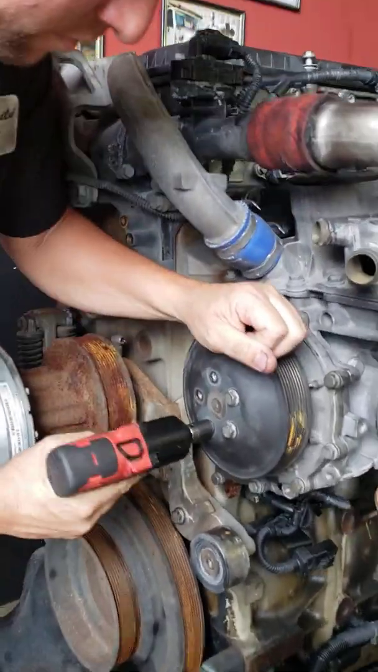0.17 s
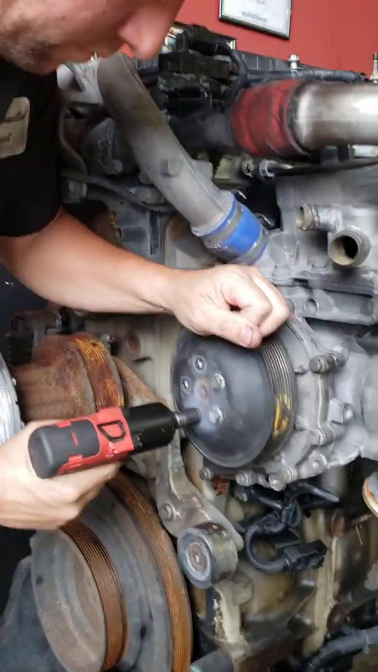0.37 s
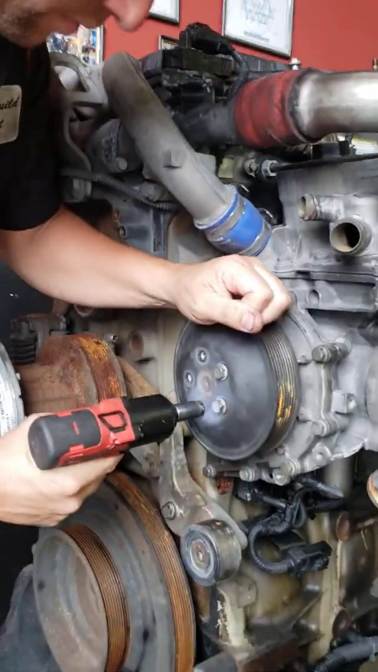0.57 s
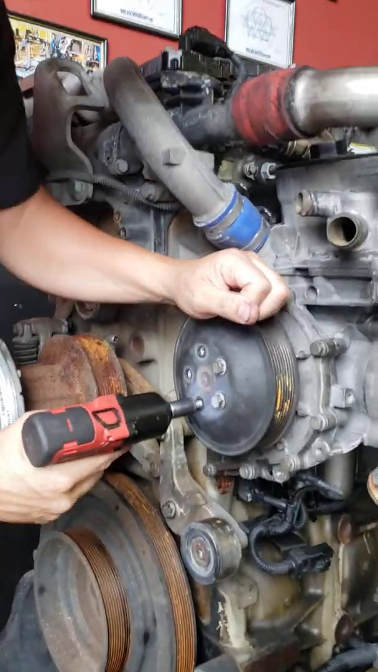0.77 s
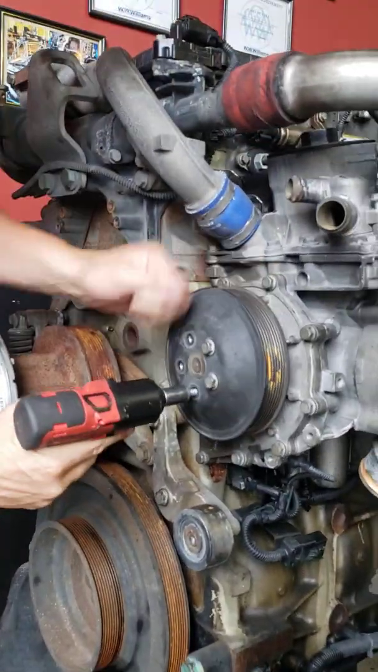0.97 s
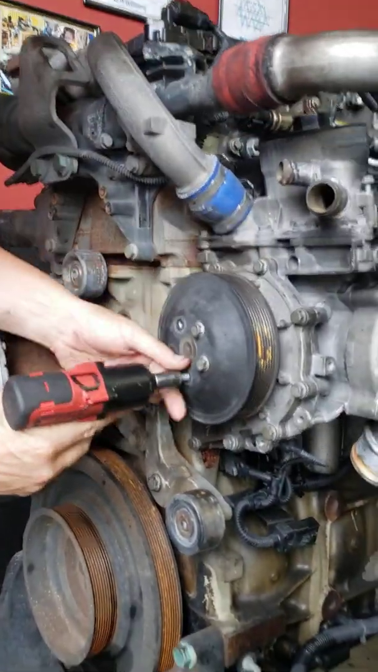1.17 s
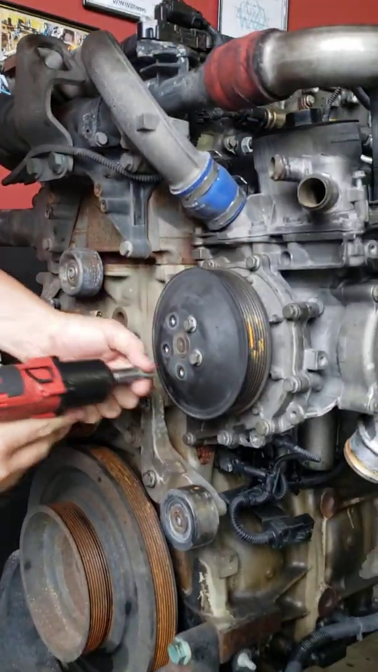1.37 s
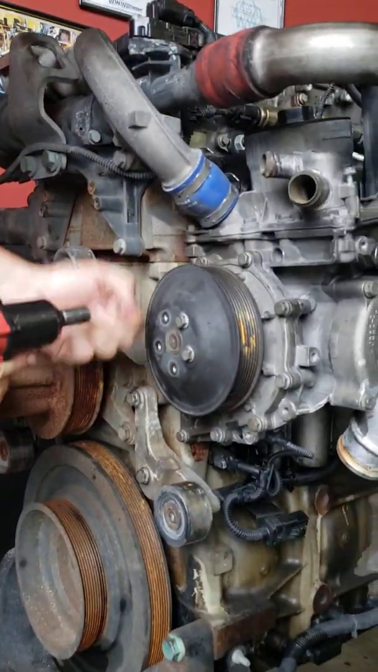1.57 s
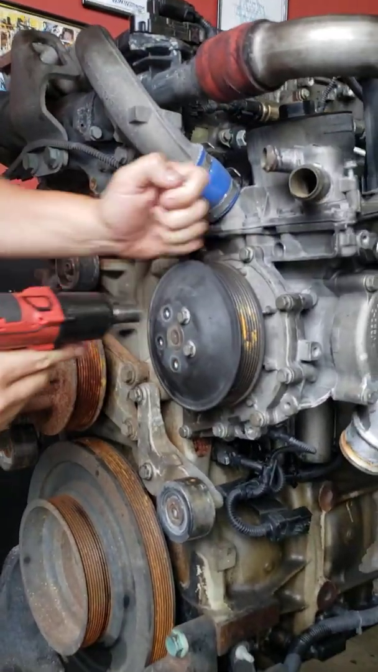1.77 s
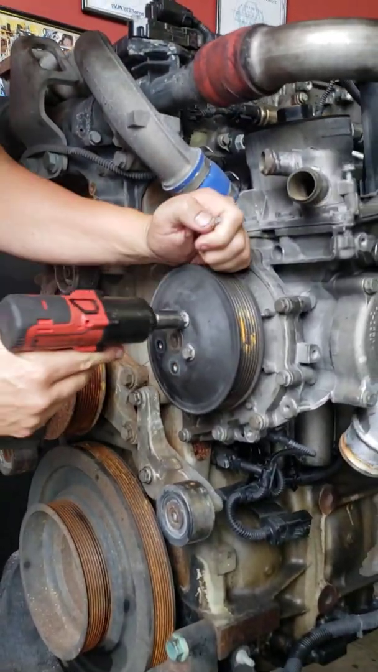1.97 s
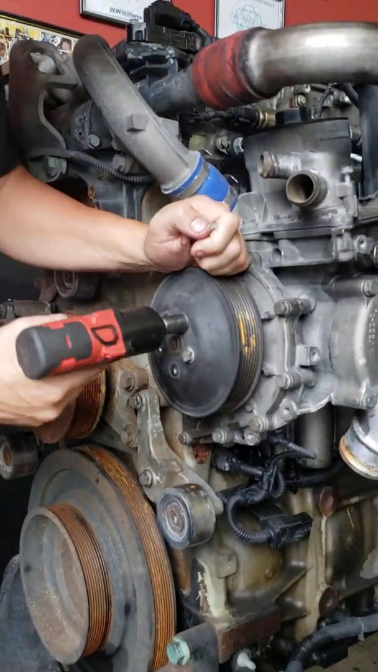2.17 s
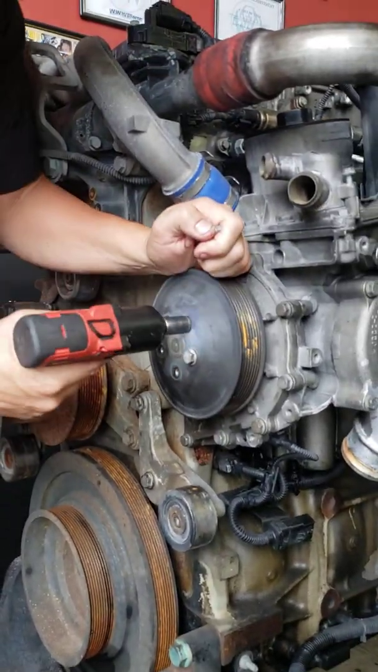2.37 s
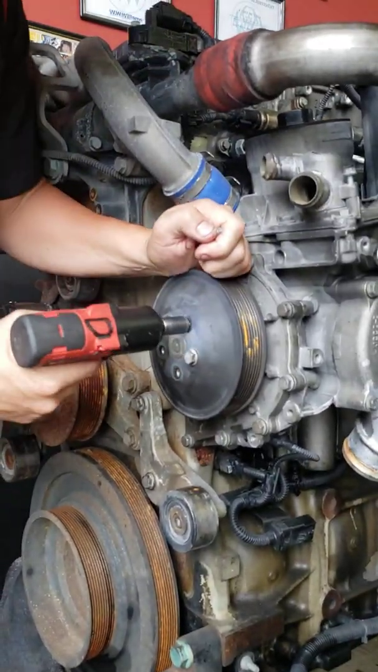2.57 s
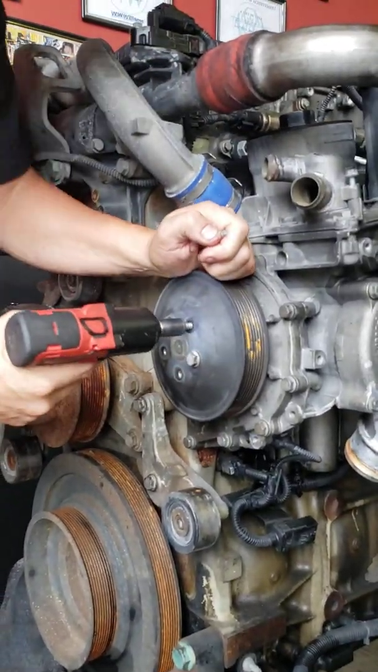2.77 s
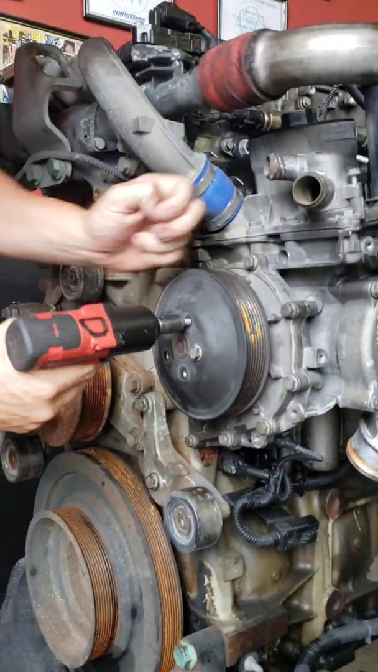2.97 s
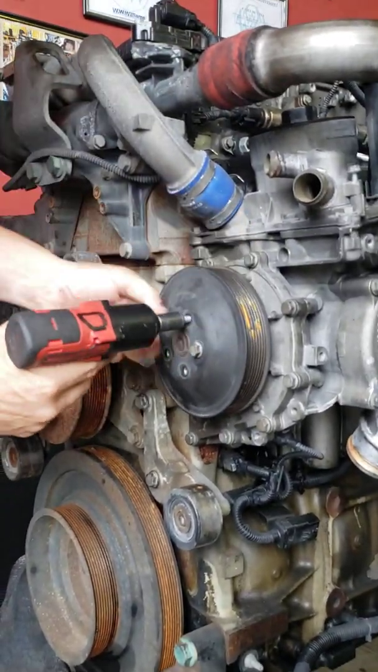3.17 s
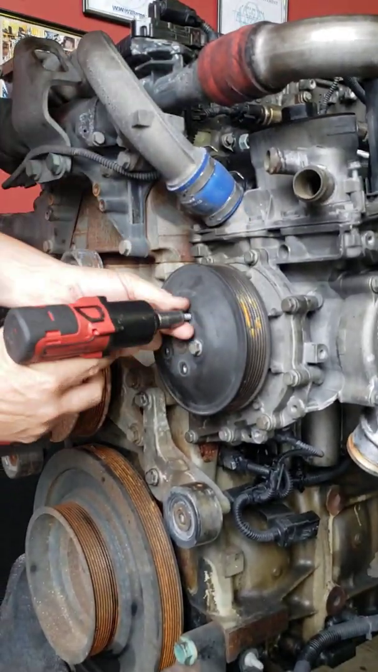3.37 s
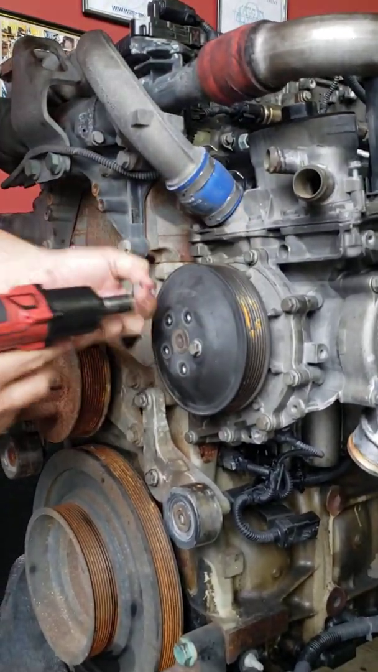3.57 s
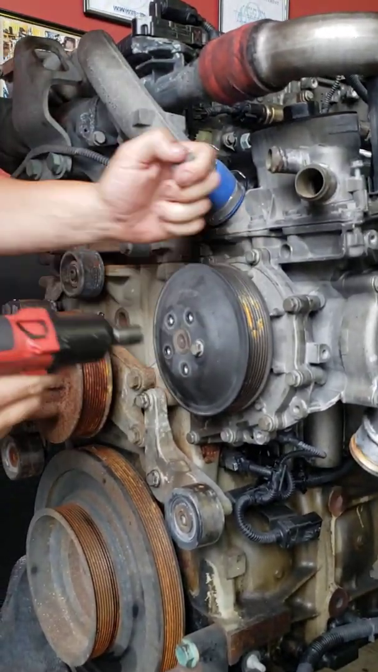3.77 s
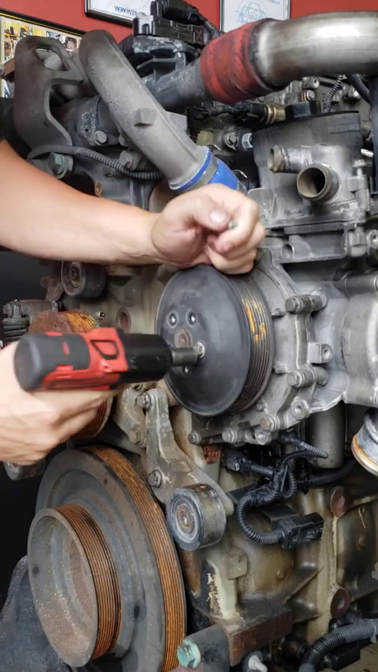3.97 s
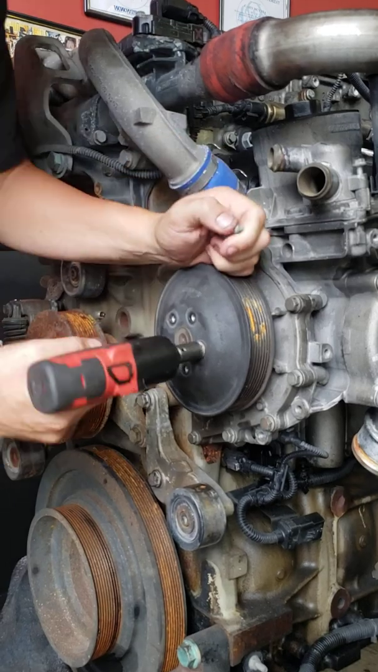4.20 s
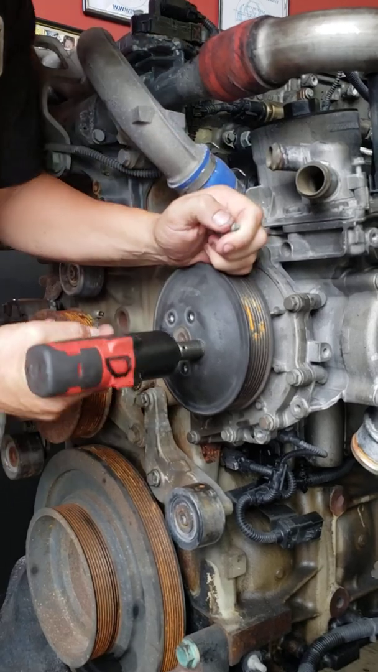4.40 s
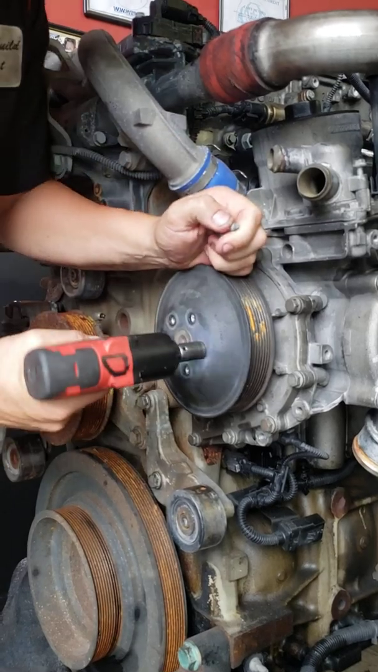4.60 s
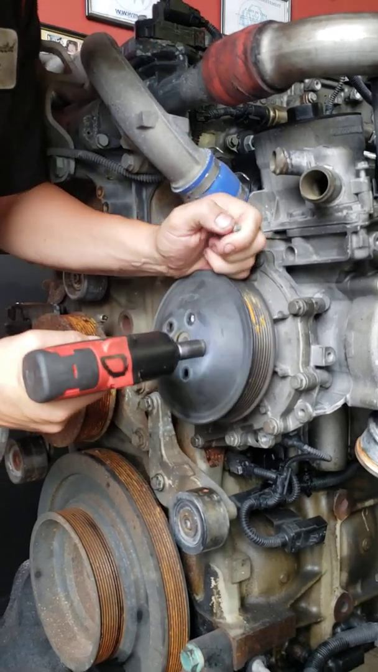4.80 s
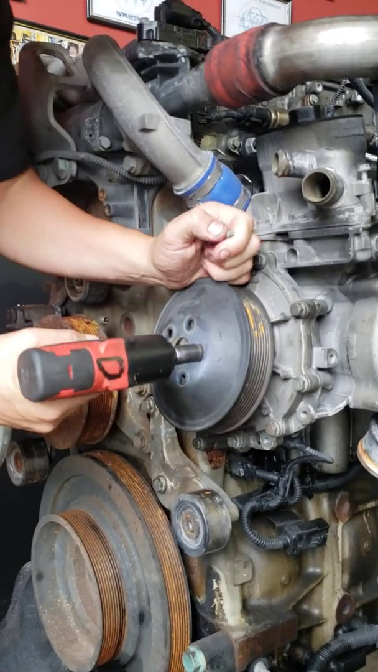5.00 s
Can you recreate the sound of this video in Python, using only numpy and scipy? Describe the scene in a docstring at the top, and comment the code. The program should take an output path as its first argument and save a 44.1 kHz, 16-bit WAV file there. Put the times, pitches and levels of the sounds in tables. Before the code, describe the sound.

Close up in a workshop, a cordless impact wrench loosens pulley bolts. Soft socket knocks lead to a tiny trigger click and a burst of six fast, loud metallic cracks, then the motor spins free with a rising whine and stops. Two similar bursts follow about two seconds apart, with knocks, clinks and near-quiet between. A faint low hum wavers behind, and the room adds a short reverberant tail.

```python
"""A cordless impact wrench runs bolts out of a steel pulley in a workshop.
Each burst is a few hammer blows (noise cracks and ringing modes), then the motor spins free and whines upward
(shaped noise and gear tones). Between bursts come socket knocks, bolt clinks and trigger clicks.
Distant machines fill the room: banded noise, a wavering low hum and two mains lines."""
import sys
import numpy as np
from scipy import signal
from scipy.fft import rfft, irfft, next_fast_len
from scipy.io import wavfile

SR = 44100
rng = np.random.default_rng(int(sys.argv[2]) if len(sys.argv) > 2 else 0)


def digitize_waveform(pressure):
    """Quantize a signal to 16-bit integers and store it at the path in sys.argv[1].

    Rows of a 2-D input are taken as channels; values are limited to [-1, 1].
    """
    field = np.atleast_2d(pressure).T
    bounded = np.clip(field, -1, 1)
    quanta = np.round(bounded * 32767).astype(np.int16)
    wavfile.write(sys.argv[1], SR, quanta)


def attenuation_scalar(level_db):
    """Turn a level in dB into a linear amplitude multiplier (20 dB per decade)."""
    decades = np.asarray(level_db, float) / 20
    return 10 ** decades


N = 222326

# trigger pulls: first blow t/s, bolt hangs loose t/s, trigger released t/s, nominal blow level/dB,
# thud re crack level/dB, motor level/dB
BURSTS = [(0.4328, 0.804, .855, -8.5, -8.5, -41), (2.4657, 2.808, 2.935, -8.5, -10.5, -39.5),
          (4.6537, 5.1, 5.2, -9, -9.5, -40.5)]
# hammer blows in each trigger pull: count
BLOWS_PER_BURST = [6, 5, 6]
# ringing modes of the steel pulley: f/Hz, level/dB, t60/s
PULLEY = [(522, -17, .22), (1104, 0, .17), (1534, -15, .08), (1933, -24, .2), (3295, -36, .15),
          (4064, -29, .12)]
FIRST_GAP_S, GAP_S = .0212, .0189   # between blows


def rms_one(x):
    """Scales a signal to rms 1."""
    return x / np.sqrt(np.mean(x ** 2) + 1e-20)


def at_hz(points, hz):
    """Reads a curve of (f/Hz, value) on a log frequency axis."""
    f_hz, value = np.array(points).T
    return np.interp(np.log(hz), np.log(f_hz), value)


def drift(rate_hz):
    """Slow random wander of rms 1: noise through two equal poles, run at SR / 40."""
    r = np.exp(-80 * np.pi * rate_hz / SR)
    white = rng.standard_normal(N // 40 + 2002)
    slow = signal.lfilter([1], [1, -2 * r, r * r], white)[2000:]   # drops the settling
    return np.interp(np.arange(N) / 40, np.arange(len(slow)), rms_one(slow))


def wide_noise(alike):
    """Two draws of stereo white noise; alike sets the correlation of the channels."""
    mid, side = rng.standard_normal((2, 2, 1, N))
    return np.sqrt(alike) * mid + np.sqrt(1 - alike) * side * [[1], [-1]]


def bands(spectrum):
    """Third-octave filters inside a spectrum's range, with centre and gain."""
    edges_hz = 22 * 2 ** np.arange(0, 9.7, 1 / 3)
    for low, high in zip(edges_hz, edges_hz[1:]):
        hz = np.sqrt(low * high)
        if spectrum[0][0] < hz and low < spectrum[-1][0]:
            sos = signal.butter(2, [low, high], "band", fs=SR, output="sos")
            yield sos, hz, attenuation_scalar(at_hz(spectrum, min(hz, 15200)))


def ring(clicks, hz, t60_s):
    """Two-pole resonator: a unit click sets off a decaying sine of height 1."""
    r, w = attenuation_scalar(-60 / (t60_s * SR)), 2 * np.pi * hz / SR
    return signal.lfilter([0, np.sin(w)], [1, -2 * r * np.cos(w), r * r], clicks + 1e-18)


def struck(modes, s, blow_db):
    """Every onset rings every mode; chance varies the strength of each mode."""
    out = np.zeros(N)
    strength_db = rng.normal(0, 2.2, (len(s), len(modes)))
    for k, (hz, level_db, t60_s) in enumerate(modes):
        clicks = np.zeros(N)
        clicks[(s * SR).astype(int)] = attenuation_scalar(blow_db + level_db + strength_db[:, k])
        out += ring(clicks, hz, t60_s)
    return out


def contacts(rows, pulley_db, crack_t60_s, thud_t60_s, tick_db):
    """Each contact is a sharp tick and a rattle that dies, coloured by the tool, and rings the pulley."""
    # colour of metal contact: f/Hz, level/dB per Hz
    crack = [(88, -53.5), (150, -19.5), (371, -18.5), (798, -2.5), (972, -8.5), (1120, -6), (1860, -13),
             (2180, -21), (3420, -8.5), (6050, -16.5), (7220, -10), (8450, -40), (12800, -3), (15600, -10),
             (16500, -31.5)]
    s, level_db, treble_db, thud_db = np.transpose(rows)
    out = 0
    white = wide_noise(alike=.75) * attenuation_scalar(3.5 * drift(150) - 1.5)   # the rattle comes in lumps
    for k, (sos, hz, gain) in enumerate(bands(crack)):
        thud_share = np.clip(np.log2(2400 / hz), 0, 1)
        treble_share = np.clip(np.log2(hz / 7000) * 2, 0, 1)
        tilt_db = thud_db * thud_share + treble_db * treble_share
        t60_s = at_hz([(800, thud_t60_s), (3000, crack_t60_s)], hz)
        clicks = np.zeros(N)
        clicks[(s * SR).astype(int)] = attenuation_scalar(level_db + tilt_db + rng.normal(0, 1.5, len(s)))
        fading = signal.lfilter([1], [1, -attenuation_scalar(-60 / (t60_s * SR))], clicks + 1e-18)
        out = out + gain * signal.sosfilt(sos, fading * white[k % 2] + attenuation_scalar(tick_db) * clicks)
    return attenuation_scalar(7.0) * out + struck(PULLEY, s, level_db + pulley_db + 0.38 * thud_db)


def blow_rows():
    """Blow timing and levels: a slow dull first blow, then an even run from two unequal lugs."""
    fade_db, weak_lug_db, scatter_db = 0.9, -0.5, 0.5   # per blow; every second blow; chance
    first_treble_db, treble_db = -12, -2   # re crack
    rows = []
    for (first_s, _, _, peak_db, thud_db, _), count in zip(BURSTS, BLOWS_PER_BURST):
        k = np.arange(count)
        s = first_s + (k > 0) * (FIRST_GAP_S + GAP_S * (k - 1))
        lug_db = weak_lug_db * (k % 2)
        level_db = peak_db - fade_db * k + lug_db + scatter_db * rng.standard_normal(count)
        blow_treble_db = np.where(k == 0, first_treble_db, treble_db - lug_db)
        rows += zip(s, level_db, blow_treble_db, thud_db + 0 * s)
    return np.array(rows)


def hammering():
    """Hammer on anvil: each blow cracks, rings the pulley and rings the anvil's own high modes."""
    # ringing modes of the anvil: f/Hz, level/dB, t60/s
    anvil = [(6971, -27, .08), (7413, -17, .11), (9997, -16, .1), (12250, -13, .2), (12600, -7, .05),
             (12910, -14, .15), (13900, -9, .08), (14175, -9, .12), (14958, -8, .13)]
    rows = blow_rows()
    cracks = contacts(rows, pulley_db=-20.5, crack_t60_s=0.076, thud_t60_s=0.12, tick_db=21.5)
    return cracks + struck(anvil, rows[:, 0], rows[:, 1] + rows[:, 2] - 4)


def trigger(t):
    """Whine and levels: held back while hammering, speeding up once the bolt turns, braked at release."""
    loaded_hz, free_hz, speed_up_s, brake_hz_per_s = 2110, 2345, .24, 3000   # gear whine
    wind_up_s, wind_up_db, surge_db, settle_s, brake_db_per_s = .018, -5, 6.5, .08, 500   # dB re motor level
    seated_rattle_db, loose_rattle_db = -22, -9   # re whirr
    whine_hz = np.full(N, 1. * loaded_hz)
    whirr, rattle, loose = np.zeros((3, N))
    for (first_s, loose_s, release_s, _, _, motor_db), count in zip(BURSTS, BLOWS_PER_BURST):
        free_s = first_s + FIRST_GAP_S + GAP_S * (count - 1)   # one gap step after the last blow's offset
        free, braked = np.maximum(t - free_s, 0), np.maximum(t - release_s, 0)
        on = (t > first_s - wind_up_s) & (braked < .1)
        climb_hz = free_hz - (free_hz - loaded_hz) * np.exp(-free / speed_up_s)
        whine_hz[on] = (climb_hz - brake_hz_per_s * braked)[on]
        hammering_db = np.interp(t, [first_s, free_s], [wind_up_db, surge_db])
        load_db = np.where(t < free_s, hammering_db, surge_db * np.exp(-free / settle_s))
        level = on * attenuation_scalar(motor_db + load_db - brake_db_per_s * braked)
        whirr += level
        loose += on * np.clip((t - loose_s) / .04, 0, 1)
        rattle_db = np.interp(t, [loose_s, loose_s + 0.0067], [seated_rattle_db, loose_rattle_db])
        rattle += level * attenuation_scalar(rattle_db)
    return whine_hz, whirr, rattle, loose


def motor():
    """Air and bearing whirr, wavering gear tones that climb with speed, and the bolt rattling on the pulley."""
    # colour of the whirr: f/Hz, level/dB per Hz
    whirr_spectrum = [(120, -50), (200, -21.5), (312, -12), (434, -22.5), (829, -7), (1770, -12.5),
                      (2210, -6), (2460, -5), (3370, -5.5), (3630, 2.5), (7060, -6.5), (8180, -39.5),
                      (11200, -6), (15300, -1.5), (16500, -16)]
    # gear and fan tones: multiple of the whine, level/dB re whirr, change once the bolt hangs loose/dB
    gear_tones = [(.125, -27, 0), (1.0, -12, -2), (1.525, -10.5, -7), (1.725, -8, -2), (2.05, -11, -9),
                  (5.09, -7, -8)]
    # modes of the rattling bolt: f/Hz, level/dB, t60/s
    rattle_modes = [(537, -13.5, 0.044), (837, -1.5, 0.037), (1462, -11, 0.066)]
    white = wide_noise(alike=0.46)
    whine_hz, whirr_level, rattle_level, loose = trigger(np.arange(N) / SR)
    turn = 2 * np.pi * np.cumsum(whine_hz) / SR
    whirr = 0
    for k, (sos, _, gain) in enumerate(bands(whirr_spectrum)):
        whirr = whirr + gain * attenuation_scalar(1.9 * drift(5.7)) * signal.sosfilt(sos, white[k % 2])
    whirr = rms_one(whirr)
    whirr *= attenuation_scalar(1.5 * np.sin(turn / 8))   # throb, once a rotor turn
    meshed = np.clip((whine_hz - 2110) / 60, 0, 1)   # tones come in as the whine climbs off its loaded pitch
    for multiple, level_db, loose_db in gear_tones:
        level = attenuation_scalar(level_db + loose_db * loose + 2.2 * drift(12))
        wobble = .5 * np.sqrt(multiple) * drift(25)
        whirr += meshed * level * np.sin(multiple * turn + wobble)
    taps = (rng.random(N) < 600 / SR) * rng.standard_normal(N)   # about 600 per s
    rattle = rms_one(sum(attenuation_scalar(level_db) * ring(taps, hz, t60_s) for hz, level_db, t60_s in rattle_modes))
    return whirr_level * whirr + rattle_level * rattle


def knocks_and_clicks():
    """Socket and bolts touching metal, and the trigger's clicks: lighter contacts of the same kind."""
    # knocks: t/s, nominal crack level/dB, treble re crack level/dB, thud re crack level/dB
    knocks = [(0.0014, -41, -6, 7), (0.1037, -36, -12, -9), (0.1641, -28, -13, 0.5),
              (0.2633, -50.5, -24, 7), (0.3535, -32, -10, -19.5), (0.8675, -33, -0.5, -7.5),
              (1.3154, -60.5, 10.5, -22.5), (1.4795, -55, -28, -38), (1.5259, -49.5, -5.5, -35.5),
              (1.6372, -53, -15, -18), (2.0675, -37, -11, -4), (2.0781, -36, -24, -15.5),
              (2.1264, -33, -15, -1), (2.4084, -61, -1, -1.5), (2.818, -31.5, 5, -3),
              (2.8426, -30.5, 2.5, -2), (2.8727, -25, -1.5, -0.5), (2.8971, -40, 6, -7),
              (3.9713, -62, -23, 9), (4.0615, -26, -6.5, -2), (4.2544, -32.5, -9, -7.5),
              (4.2771, -22.5, -5.5, 5.5), (4.6054, -41.5, -9.5, -10)]
    # trigger clicks: t/s, nominal crack level/dB, treble re crack level/dB, thud re crack level/dB
    trigger_clicks = [(0.412, -45.5, -16, -13), (2.4432, -42, -18, -17.5), (4.6363, -37, -16, -10)]
    return contacts(knocks + trigger_clicks, pulley_db=-24.5, crack_t60_s=0.064, thud_t60_s=0.15, tick_db=14.0)


def clinks():
    """A loose bolt clinks in the socket and rings the socket's modes."""
    # ringing modes of the socket: f/Hz, level/dB, t60/s
    socket = [(7343, -5, 0.1), (8371, -19, 0.31), (10010, -20, 0.16), (12050, -12, 0.2), (12250, -4, 0.22),
              (12500, 0, 0.13), (12930, -8, 0.41), (13160, -12, 0.32), (13930, -11, 0.19),
              (14170, -12, 0.45), (14970, -24, 0.27)]
    # clinks: t/s, ring level/dB
    clink_rows = [(0.868, -52.5), (1.315, -50.5), (2.818, -43.5), (2.871, -54), (2.896, -47), (4.064, -56)]
    return struck(socket, *np.transpose(clink_rows))


def pulley_ringing():
    """The pulley's modes ring on as the first burst stops and at a later knock."""
    # onsets of the ringing: t/s, ring level/dB
    ring_rows = [(0.885, -56.5), (4.0616, -31.5)]
    return struck(PULLEY, *np.transpose(ring_rows))


def lingering_tone():
    """A thin tone, one slowly decaying mode, rings on after the loose bolt has rattled."""
    # mode: f/Hz, level/dB, t60/s
    linger = [(1931, -75, 2.4)]
    return struck(linger, np.array([2.897]), 0)


def heard(x, near_db, near_t60_s, tail_db):
    """Direct sound at two ports, quick reflections off the engine block, and the long tail of the shop."""
    # left-right level difference: f/Hz, level/dB
    lean = [(60, 5), (130, 2), (290, 1.5), (640, -2), (1410, -3.5), (3100, -11), (6820, -2), (15000, -13)]
    # decay of the shop: f/Hz, t60/s
    shop_t60 = [(200, 0.63), (1000, 0.56), (3000, 0.8), (8000, 0.96), (16000, 0.23)]
    # the tool goes to the next bolt: t/s
    moves_s = [0, 1.2, 3.6, 6]
    left_lead_s = 3e-5
    size, t = next_fast_len(N + 2 * SR), np.arange(int(1.5 * SR)) / SR
    hz = np.maximum(np.fft.rfftfreq(size, 1 / SR), 1)
    half = attenuation_scalar(at_hz(lean, hz) / 2) * np.exp(1j * np.pi * hz * left_lead_s)
    ports = np.array([half, 1 / half])
    white, tail = rng.standard_normal((2, 2, len(t))) / np.sqrt(SR), 0
    for k, (sos, centre_hz, _) in enumerate(bands([(100, 0), (17000, 0)])):
        decay = attenuation_scalar(tail_db - 60 * t / at_hz(shop_t60, centre_hz))
        tail = tail + signal.sosfilt(sos, white[k % 2]) * decay * (t > .008)
    out = rfft(x, size) * rfft(tail, size) * abs(ports) ** .5
    for start_s, end_s in zip(moves_s, moves_s[1:]):   # new reflections from each place
        near = attenuation_scalar(near_db - 60 * t / near_t60_s) * rng.standard_normal((2, len(t))) / np.sqrt(SR)
        here = x * (np.arange(N) >= start_s * SR) * (np.arange(N) < end_s * SR)
        out += rfft(here, size) * ports * (1 + rfft(near, size))
    return irfft(out, size)[:, :N]


def far_noise(spectrum, patchy_db):
    """Diffuse stereo noise, each band flickering on its own; rms 1."""
    # left-right correlation: f/Hz, likeness
    likeness = [(60, 1), (240, 0.81), (950, 0.097), (3770, 0.066), (15000, 0.03)]
    out, white = 0, rng.standard_normal((2, 2, N))
    for k, (sos, hz, gain) in enumerate(bands(spectrum)):
        mid, side = signal.sosfilt(sos, white[k % 2])
        alike = np.clip(at_hz(likeness, hz), -1, 1)
        stereo = np.sqrt(1 + alike) * mid + np.sqrt(1 - alike) * side * [[1], [-1]]
        out = out + gain * attenuation_scalar(patchy_db * drift(3)) * stereo
    return rms_one(out)


def shop_hum():
    """Distant machines: rumble, a wavering low tone, mains lines and a faint hiss."""
    # room levels: t/s, rumble level/dB, low hum level/dB
    shop = [(0, -52.5, -46.5), (.3, -52, -54), (.6, -59.5, -78.5), (1.2, -62, -61), (2.1, -55.5, -54.5),
            (2.5, -57, -53), (3.4, -60, -64), (3.7, -60.5, -66), (4.1, -53.5, -62.5), (4.6, -55, -70),
            (5.05, -64.5, -73)]
    # mains lines: f/Hz, rms level/dB before drift
    mains = [(120, -70), (360.5, -77)]
    # colour of the rumble: f/Hz, level/dB per Hz
    rumble = [(13, -53), (34, -15), (75, -10), (129, -23), (146, -26.5), (296, -33.5), (322, -34.5),
              (365, -18), (385, -41.5), (600, -47.5), (780, -77), (1320, -120)]
    # colour of the hiss: f/Hz, level/dB per Hz
    hiss = [(500, -15.5), (900, -6), (1900, -5.5), (3300, -4), (6200, -4), (8000, -30), (10500, -23),
            (13000, -15), (16500, -19.5)]
    t = np.arange(N) / SR
    s, rumble_points_db, hum_points_db = np.transpose(shop)
    rumble_db, hum_db = np.interp(t, s, rumble_points_db), np.interp(t, s, hum_points_db)
    hiss_db = -77.5 + 0.13 * (hum_db - hum_db.mean())   # follows a share of the hum's swing
    hum_phase = 2 * np.pi * 73.4 * t + .6 * drift(0.52) + [[.25], [-.25]]   # 73.4 Hz, channels offset
    tones = np.sqrt(2) * attenuation_scalar(hum_db + 0.87 * drift(1.1)) * np.sin(hum_phase)
    for hz, level_db in mains:
        level = np.sqrt(2) * attenuation_scalar(level_db + 1.1 * drift(5.1))
        tones += level * np.sin(2 * np.pi * hz * t + 0.5 * drift(3.3))
    noise = attenuation_scalar(rumble_db) * far_noise(rumble, patchy_db=1.0) + attenuation_scalar(hiss_db) * far_noise(hiss, patchy_db=0.5)
    return noise + tones


def scene():
    """Sums the tool's sounds, places them in the shop and adds the background."""
    tool = hammering() + motor() + knocks_and_clicks()
    tool += clinks() + pulley_ringing() + lingering_tone()
    return heard(tool, near_db=18.5, near_t60_s=0.0036, tail_db=1.5) + shop_hum()


def roll_off(x):
    """The treble ends steeply here."""
    return signal.sosfilt(signal.butter(12, 16660, fs=SR, output="sos"), x)


def record(dry):
    """A steep low-pass cuts the top; peaks are clipped at full scale."""
    cut = signal.sosfilt(signal.cheby2(14, 60, 16400, fs=SR, output="sos"), dry)
    mix = np.clip(cut, -1, 1)
    return roll_off(mix)


dry = scene()
out = record(dry)
digitize_waveform(out)
```